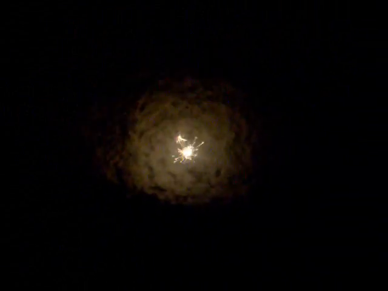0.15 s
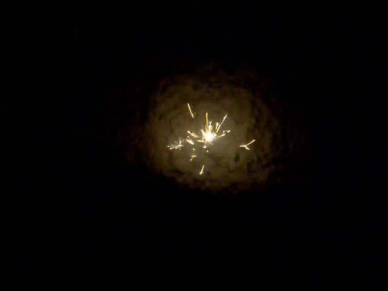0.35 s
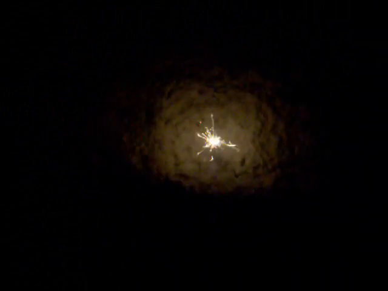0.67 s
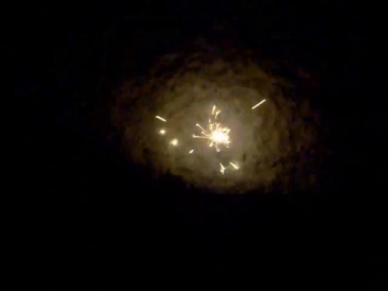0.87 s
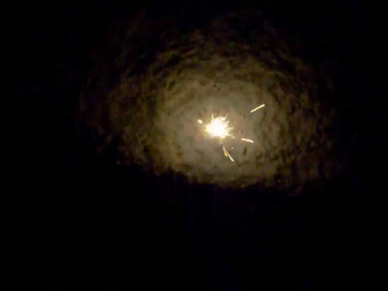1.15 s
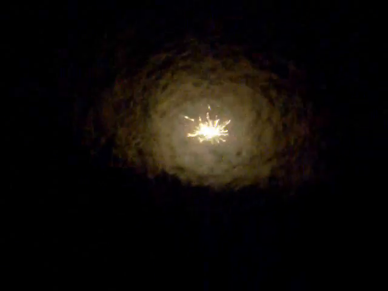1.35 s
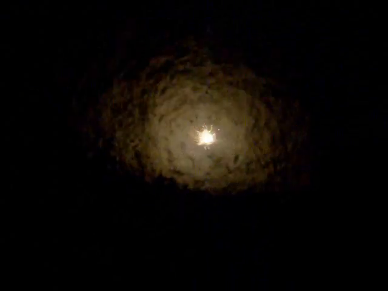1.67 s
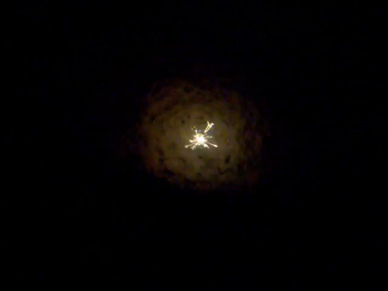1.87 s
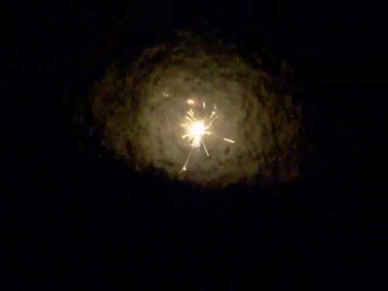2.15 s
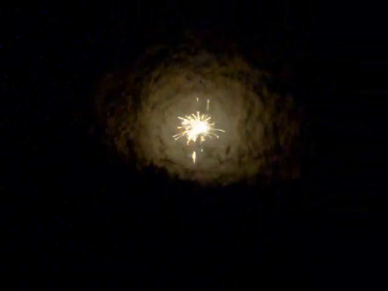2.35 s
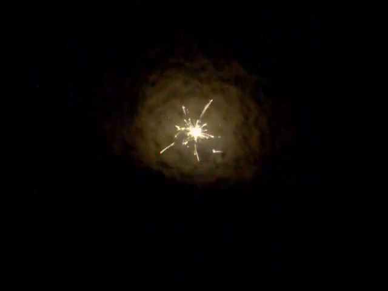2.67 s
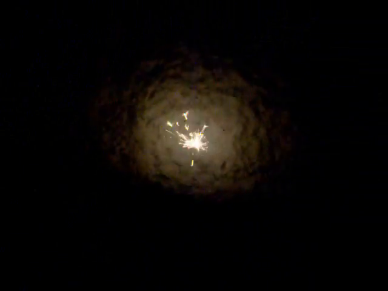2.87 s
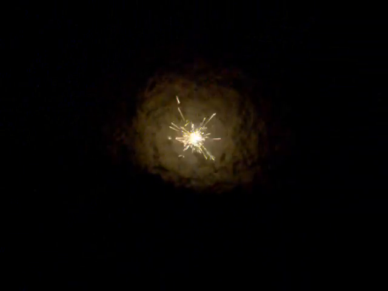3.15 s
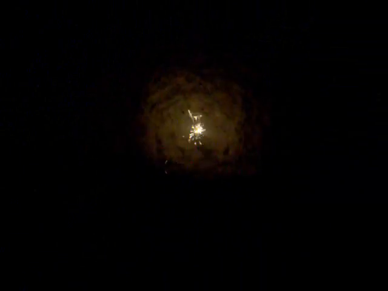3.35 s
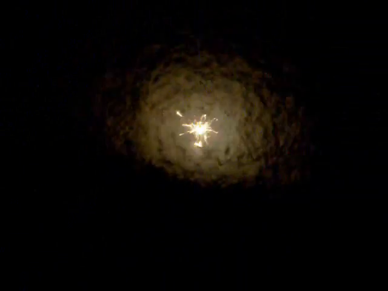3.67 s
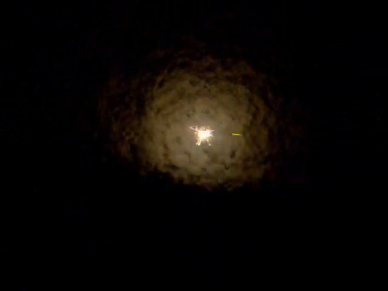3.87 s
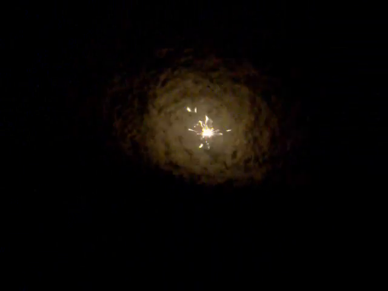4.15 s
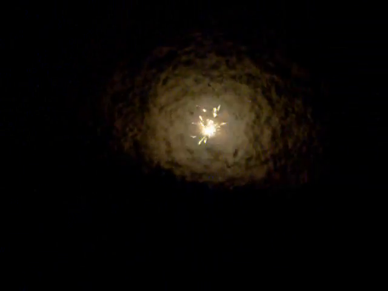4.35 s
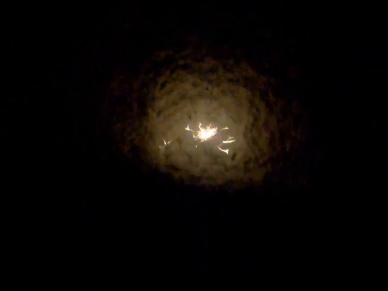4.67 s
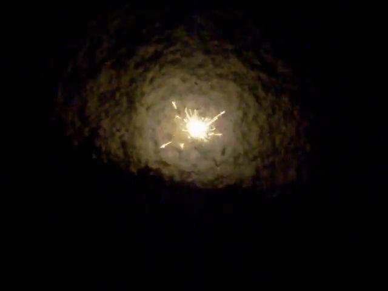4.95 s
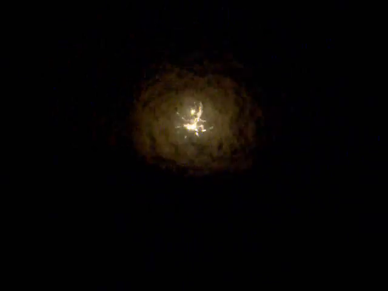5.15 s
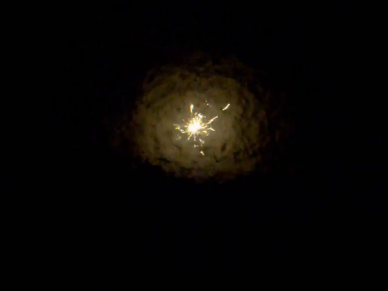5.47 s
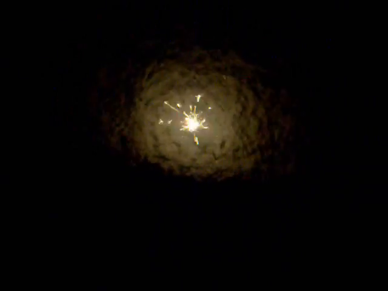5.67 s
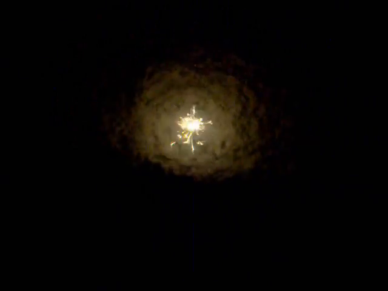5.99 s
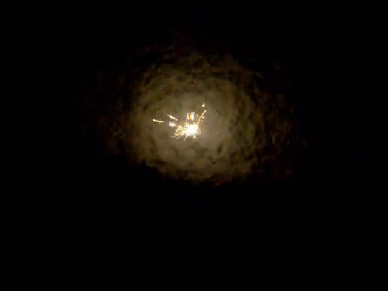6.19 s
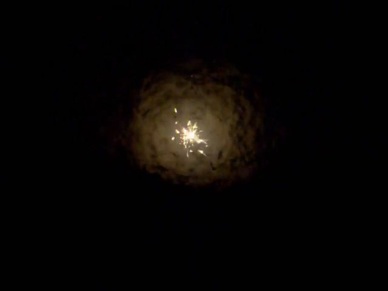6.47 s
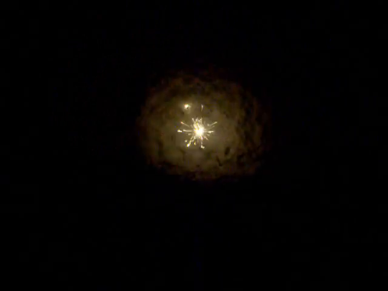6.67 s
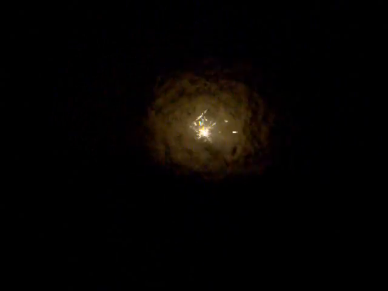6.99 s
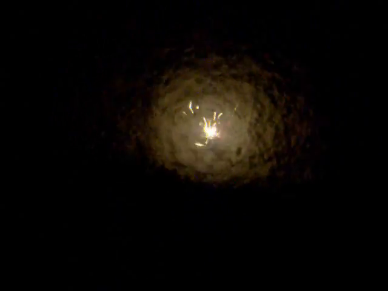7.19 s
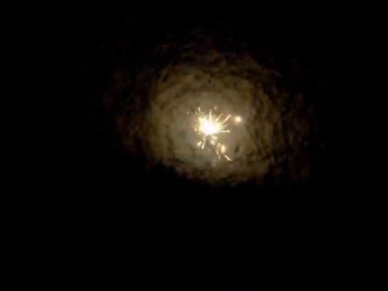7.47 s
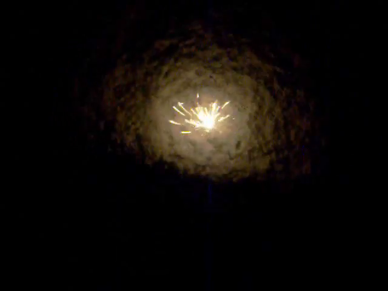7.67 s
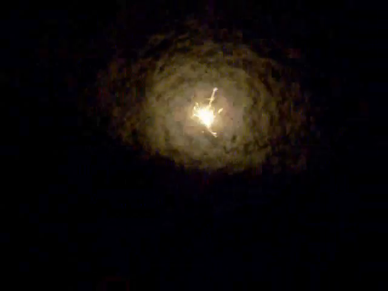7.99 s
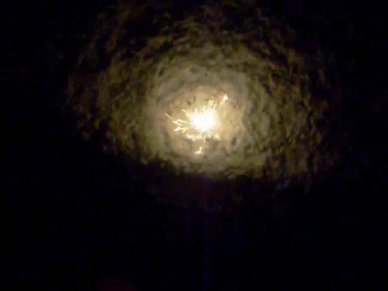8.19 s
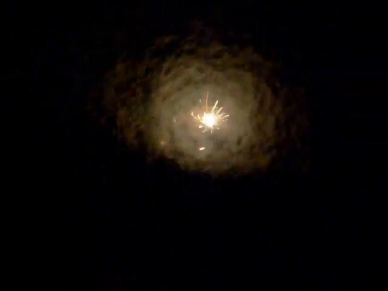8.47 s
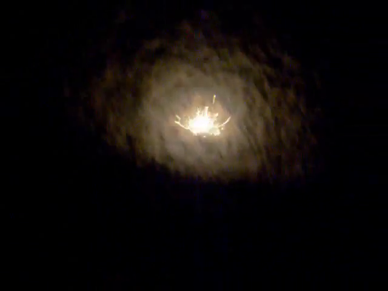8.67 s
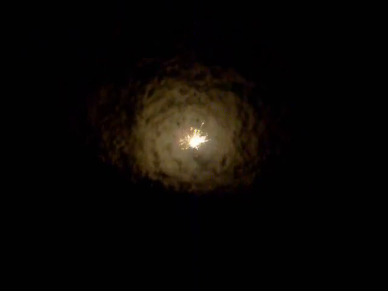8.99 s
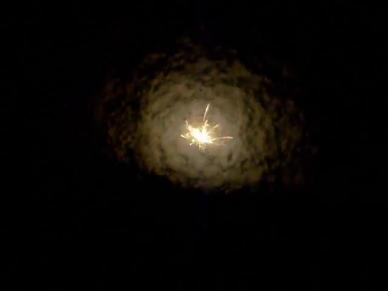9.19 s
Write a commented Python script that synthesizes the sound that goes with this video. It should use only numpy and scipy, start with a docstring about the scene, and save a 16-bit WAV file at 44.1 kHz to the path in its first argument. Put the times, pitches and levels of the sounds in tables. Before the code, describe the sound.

A sparkler burns outdoors at night, a step from a small handheld camera. Its faint fizz sputters and swells unevenly while sparks burst with tiny sharp cracks throughout. A low distant rumble, a wavering hum and a thin hiss lie underneath. Fingers tap the plastic body lightly at first; near the end comes a soft knock, then a button press that is by far the loudest sound.

```python
"""A sparkler fizzes at night, a step away from a small handheld camera. Gas jets sputter from its
burning coat and sparks burst with sharp cracks, all coloured by the microphone port.
Underneath sit a far rumble with a wavering hum, and the camera's own hiss and whine.
Fingers set the plastic camera body ringing: a few early taps, then a knock and a button press
near the end."""
import sys
import numpy as np
from scipy import signal
from scipy.fft import rfft, irfft
from scipy.io import wavfile
from scipy.ndimage import uniform_filter1d

SR = 44100
rng = np.random.default_rng(int(sys.argv[2]) if len(sys.argv) > 2 else 0)


def store_pcm(level_fs):
    """Save levels as 16-bit WAV."""
    pcm = np.round(np.clip(level_fs, -1, 1) * 32767).astype(np.int16)
    wavfile.write(sys.argv[1], SR, np.atleast_2d(pcm).T)


N = 411453


def undb(db):
    return 10 ** (np.asarray(db) / 20)


def at_rms(x, db):
    return x * undb(db) / np.sqrt(np.mean(x ** 2))


def automation(table):
    """One per-sample curve for each column after the time."""
    times, *columns = np.transpose(table)
    return [np.interp(np.arange(N) / SR, times, column) for column in columns]


def eq(x, points, size=4096):
    """Minimum-phase EQ through (frequency [Hz], gain [dB]) points."""
    hz, db = np.transpose(points)
    grid_hz = np.linspace(1, SR / 2, size // 2 + 1)
    gain = undb(np.interp(np.log(grid_hz), np.log(hz), db))
    cepstrum = irfft(np.log(gain))
    cepstrum[1:size // 2] *= 2  # folding makes the filter causal
    cepstrum[size // 2 + 1:] = 0
    impulse = irfft(np.exp(rfft(cepstrum)))
    return signal.fftconvolve(x, impulse)[:len(x)]


def band(x, lo_hz, hi_hz):
    return signal.sosfilt(signal.butter(2, [lo_hz, hi_hz], "bandpass", fs=SR, output="sos"), x)


def wander(rate_hz):
    """Smoothed random sample-and-hold with a spread of 1."""
    hold = int(SR / rate_hz)
    steps = np.repeat(rng.standard_normal(N // hold + 1), hold)
    smooth = uniform_filter1d(uniform_filter1d(steps, hold), hold)[:N]
    return smooth / smooth.std()


def puffs(per_s, scatter_db, top_db, decay_ms):
    """Random noise puffs with an instant attack; most are small, none starts above top_db."""
    noise = rng.standard_normal(N)
    triggers = rng.random(N) < per_s / SR
    strength = undb(np.minimum(scatter_db * rng.exponential(size=N), top_db))
    return noise * signal.lfilter([1], [1, -np.exp(-1000 / (decay_ms * SR))], triggers * strength)


# The steady burn under the swells: (time [s], level [dB])
STEADY_BURN = [(0, -60), (.12, -56), (.7, -54), (1.27, -57), (1.6, -54.5), (1.97, -59.5), (2.15, -53),
               (2.64, -59), (2.72, -54.5), (3.4, -56), (4, -56.5), (4.8, -56.5), (4.89, -57), (5.2, -57),
               (5.6, -53), (6, -57), (6.9, -55), (7.75, -54), (7.95, -53), (8.12, -59), (8.3, -56),
               (8.6, -54), (9.07, -56), (9.3, -53.5)]
# Brief swells of the fizz, mostly as the coat flares up, a few short ones with a single spark: (time [s], peak
# [dB], length [ms])
FIZZ_SWELLS = [(.1, -55.5, 64), (.47, -55.5, 34), (.54, -55, 26), (.62, -52, 25), (.72, -57.5, 29),
               (.8, -58, 34), (.86, -53.5, 34), (1.15, -56, 110), (1.31, -55.5, 53), (1.53, -57, 50),
               (1.9, -61, 39), (2.2, -56, 40), (2.26, -55, 50), (2.36, -57.5, 18), (2.49, -55.5, 50),
               (2.8, -54.5, 41), (2.98, -58, 30), (3.15, -54.5, 60), (3.26, -54, 63), (3.36, -55.5, 45),
               (3.56, -57, 70), (3.81, -56.5, 36), (4.13, -52.5, 53), (4.2, -54.5, 36), (4.3, -55, 32),
               (4.57, -54.5, 43), (4.67, -56.5, 61), (4.84, -52.5, 29), (5.02, -52.5, 77), (5.15, -57, 40),
               (5.29, -55, 43), (5.37, -56.5, 100), (5.56, -56.5, 90), (6.11, -53.5, 156),
               (6.53, -54.5, 82), (7.04, -60, 25), (7.15, -53.5, 21), (7.35, -55, 44), (7.57, -51.5, 61),
               (7.67, -57, 30), (7.84, -59.5, 35), (8.02, -53, 66), (8.21, -53, 72), (8.43, -59, 52),
               (8.735, -52, 33), (8.81, -57, 43)]
def fizz_envelope():
    """The coat burns a little unevenly; brief swells rise and fade on top."""
    wander_db, fade_to_rise = 0.54, 1.11
    t = np.arange(N) / SR
    power = undb(automation(STEADY_BURN)[0] + wander_db * wander(14)) ** 2
    for time, peak_db, length_ms in FIZZ_SWELLS:
        half_width = length_ms / 2000 * np.where(t < time, 1, fade_to_rise)
        power += undb(peak_db) ** 2 * np.exp(-((t - time) / half_width) ** 2)
    return np.sqrt(power)


def fizz():
    """Gas jets sputter from the burning coat while countless small sparks crack."""
    jet = rng.standard_normal(N) * undb(0.6 * wander(25) + 0.94 * wander(90))
    sputter = puffs(per_s=110, scatter_db=2, top_db=4, decay_ms=4)
    crackle = puffs(per_s=400, scatter_db=3, top_db=6, decay_ms=0.3)
    blend = at_rms(jet, 0) + at_rms(sputter, -4.5) + at_rms(crackle, -6.5)
    return blend * fizz_envelope() / eq(blend, PORT_FACING).std()  # level set through the port


# Tone of the microphone port facing the sparkler: (frequency [Hz], gain [dB])
PORT_FACING = [(300, -11.5), (1400, -5), (1750, -8.5), (2480, -1.5), (2900, -8.5), (3250, -3.5),
               (3750, 1.5), (4020, -1), (4350, -9), (5250, -16), (5780, -25.5), (6500, -18), (9000, -27),
               (11500, -32), (15500, -26.5)]
# Tone of the port at a slant: (frequency [Hz], gain [dB])
PORT_OFF_AXIS = [(300, -12), (1200, -5), (1750, -8), (2450, -3.5), (2900, -7), (3650, -0.5), (4450, -4.5),
                 (5000, -11.5), (5600, -16.5), (6300, -26.5), (6900, -21.5), (9000, -27), (11500, -29.5),
                 (15500, -30)]
# Slow turns of the hand: (time [s], off-axis mix [0-1], sheen gain [dB], low-mid gain [dB])
HAND_TURNS = [(0, .4, -3, 3), (.4, 1, -2, 0), (1.2, 1, 1, -2), (2.0, .75, -2, 0.5), (2.7, .3, -0.5, -1),
              (3.3, 0, -3, -1), (4.5, 0, -2, -.5), (5.4, 0, 3.5, -0.5), (7.5, .05, 1.5, -3),
              (9.3, .3, 1, -1)]
def microphone_port(x):
    """The port colours the sparkler; its resonances change as the hand turns."""
    slant, sheen_db, low_mid_db = automation(HAND_TURNS)
    x = (1 - slant) * eq(x, PORT_FACING) + slant * eq(x, PORT_OFF_AXIS)
    sheen = (undb(sheen_db) - 1) * band(x, 4770, 5600)
    low_mids = (undb(low_mid_db) - 1) * band(x, 340, 1720)
    return x + sheen + low_mids


# Tone of the far rumble: (frequency [Hz], gain [dB])
RUMBLE_EQ = [(15, -30), (32, -25), (50, -0.5), (70, 0.5), (110, -4.5), (250, -1.5), (600, -6), (1500, -33)]
# Swells of the distant bed: (time [s], rumble level [dB], hum level [dB])
FAR_SWELLS = [(0, -73, -88), (.25, -68, -83), (.65, -69.5, -76), (1.1, -72, -81), (1.6, -70, -72),
              (2, -74, -90), (2.75, -71.5, -79), (3.3, -78, -86), (4.1, -69, -75), (4.7, -72.5, -75),
              (5.5, -74, -78.5), (6.1, -70, -75.5), (6.6, -69.5, -73), (7.2, -69, -76.5), (7.5, -69, -67.5),
              (7.85, -66, -75.5), (8.1, -66.5, -65.5), (8.45, -68, -86), (9, -68, -75), (9.33, -65.5, -72)]
def far_rumble():
    """Low rumble of the night, with a narrow hum that comes and goes."""
    hum_hz = 194.6
    rumble_db, hum_db = automation(FAR_SWELLS)
    rumble = eq(rng.standard_normal(N), RUMBLE_EQ)
    hum = band(rng.standard_normal(N), hum_hz - 13, hum_hz + 16)
    return at_rms(rumble, rumble_db) + at_rms(hum, hum_db)


# Tone of the camera's hiss: (frequency [Hz], gain [dB])
HISS_EQ = [(300, 1.5), (3000, -3.5), (7000, -5), (11000, -14.5), (15500, -5)]
# Whine of the electronics: (frequency [Hz], rms level [dB])
WHINE_TONES = [(7187, -89), (8786, -96), (8845, -97), (13264, -98), (14863, -94)]
def camera_electronics():
    """The electronics add an even hiss and thin, steady whines."""
    hiss = at_rms(eq(rng.standard_normal(N), HISS_EQ), db=-71.5)
    hz, db = np.transpose(WHINE_TONES)[:, :, None]
    whines = np.sqrt(2) * undb(db) * np.sin(2 * np.pi * hz * np.arange(N) / SR)
    return hiss + whines.sum(axis=0)


# Modes of the plastic body: (frequency [Hz], relative peak [dB], decay by 60 dB [s], attack [ms])
BODY_MODES = [(304.7, -12.5, 0.29, 2.6), (378, -11.5, 0.12, 8.4), (480, -13, 0.075, 3.4),
              (629, -5, 0.042, 3.1), (865.6, -2.5, 0.017, 5.8), (1194, -1, 0.01, 1),
              (1401, -11, 0.017, 0.57), (1733, -16, 0.014, 0.5), (2503, -23, 0.019, 2.2),
              (3134, -12, 0.009, 0.16), (3910, -23, 0.02, 0.28)]
# Taps, knock and button press: (time [s], peak [dB], hardness [dB per octave])
TOUCHES = [(0.0418, -40, 12), (0.4866, -44, 7), (0.7045, -43, 14), (8.648, -28, 4), (8.6545, -29, 3),
           (8.662, -32, -1), (8.690, -34, 4), (8.731, -40, 4), (8.833, -48, 1.5), (8.976, -45, -1.5),
           (8.983, -44, 11), (9.3130, -26.5, 7), (9.3238, -5.5, 4.5)]
def finger_knocks():
    """Every touch rings the same body; low modes bloom late, hard touches favour the high ones."""
    hz, db, t60, attack_ms = np.transpose(BODY_MODES)[:, :, None]
    t = np.arange(SR // 2) / SR
    attack = (1 - np.exp(-1000 * t / attack_ms)) ** 3
    envelope = attack * undb(-60 * t / t60)
    modes = np.sin(2 * np.pi * hz * t) * undb(db) * envelope / envelope.max(axis=1, keepdims=True)
    track = np.zeros(N + len(t))
    for time, peak_db, hardness in TOUCHES:
        ring = (modes * undb(hardness * np.log2(hz / 800))).sum(axis=0)
        start = int(time * SR)
        track[start:start + len(t)] += undb(peak_db) * ring / np.abs(ring).max()
    return track[:N]


# The loudest bursting sparks: (time [s], peak through the facing port [dB], body gain [dB])
SPARK_HITS = [(0.0426, -41, 3), (0.262, -41, 0), (0.4665, -36, 3), (0.47, -37, 9), (0.5338, -37, 10),
              (0.6375, -39, 2), (0.694, -39, -1), (0.705, -35.5, 14), (0.798, -35, -6), (0.95, -36, 2),
              (1.004, -41.5, -6), (1.1901, -39, -2), (1.9037, -41, 3), (2.152, -43, 10), (2.1977, -38, 1),
              (2.222, -43, 2), (2.4802, -39, 2), (2.7938, -34.5, 0), (2.8307, -37.5, 8), (3.0893, -40, -5),
              (3.253, -43, -3), (3.349, -37, 1), (3.6945, -41, -3), (3.807, -42, -2), (3.892, -42, 0),
              (3.9242, -42, -3), (4.664, -41, 1), (4.8292, -36.5, 1), (4.8381, -39, 5), (4.9385, -40, 2),
              (5.2132, -39.5, -2), (5.2810, -37, 9), (5.2956, -37, 1), (5.3557, -38, 4), (5.3574, -35, 2),
              (5.394, -37.5, 6), (5.4473, -41, 9), (5.519, -40, 2), (5.7162, -37, 0), (5.7673, -37, 0),
              (5.7874, -38, -2), (5.9005, -39, -8), (5.963, -39, -1), (6.0313, -37, 2), (6.0759, -39, 7),
              (6.0985, -38, 0), (6.139, -34, -4), (6.2354, -38, -1), (6.355, -43, -4), (6.5045, -37, 7),
              (6.644, -44, 2), (6.6747, -32.5, -6), (7.037, -31, 3), (7.0436, -39, 0), (7.1355, -40, -3),
              (7.139, -39, 3), (7.3395, -41, -4), (7.6753, -35.5, -3), (7.718, -40, 4), (8.0332, -38, -1),
              (8.191, -41, 0)]
def bursting_sparks():
    """Each large spark bursts with a crack and a very short tail of noise."""
    decay_ms = 0.92
    t = np.arange(1024) / SR
    track = np.zeros(N + len(t))
    for time, peak_db, body_db in SPARK_HITS:
        burst = rng.standard_normal(len(t)) * np.exp(-1000 * t / decay_ms)
        burst[0] += 4.5  # the crack
        burst = uniform_filter1d(burst, size=4)  # soften the transient
        burst += (undb(body_db) - 1) * band(burst, 560, 2600)
        start = int(time * SR)
        track[start:start + len(t)] += undb(peak_db) * burst / np.abs(eq(burst, PORT_FACING)).max()
    return track[:N]


def scene():
    """Mono mix; only the sparkler passes through the port."""
    sparkler = microphone_port(fizz() + bursting_sparks())
    return (sparkler + finger_knocks() + far_rumble() + camera_electronics())[None]


def record(dry):
    """The camera cuts the top end steeply."""
    cutoff_hz = 15450
    return signal.sosfilt(signal.ellip(10, .2, 60, cutoff_hz, fs=SR, output="sos"), dry)


dry = scene()
out = record(dry)
store_pcm(out)
```